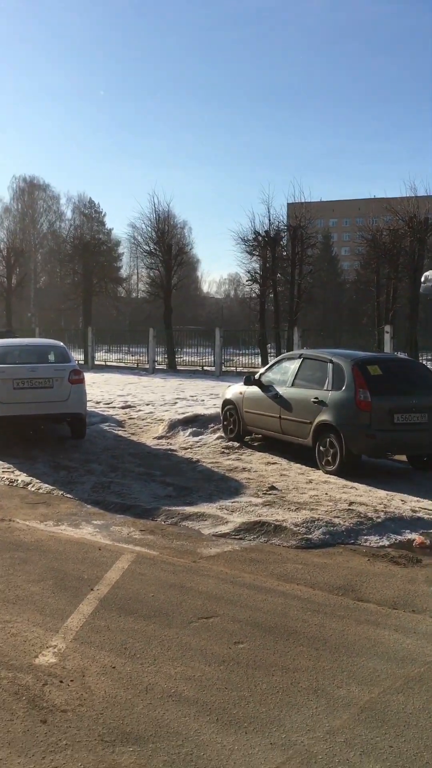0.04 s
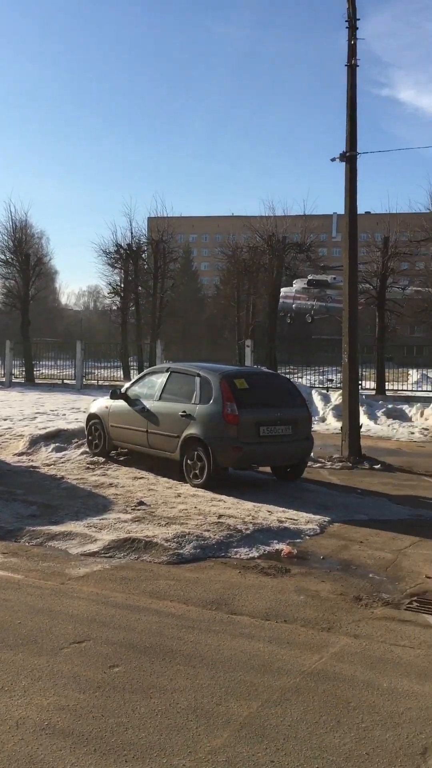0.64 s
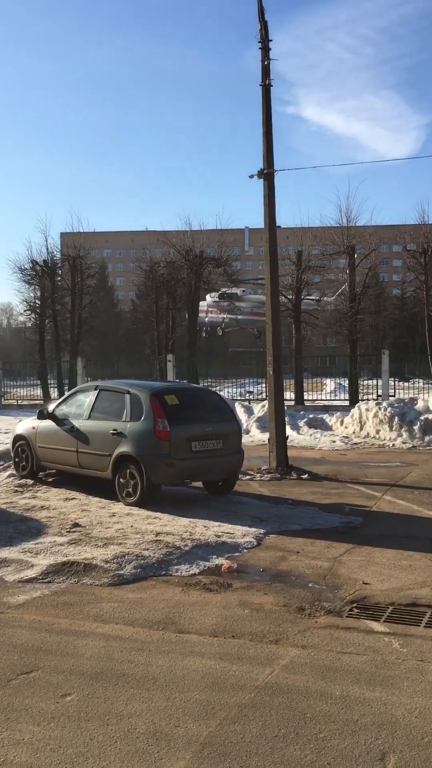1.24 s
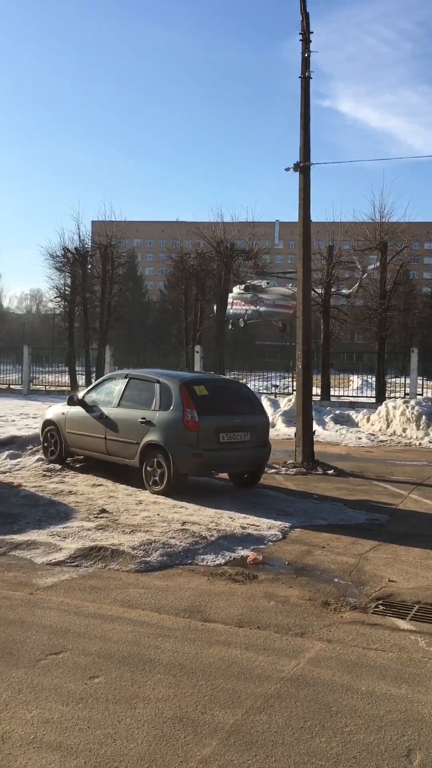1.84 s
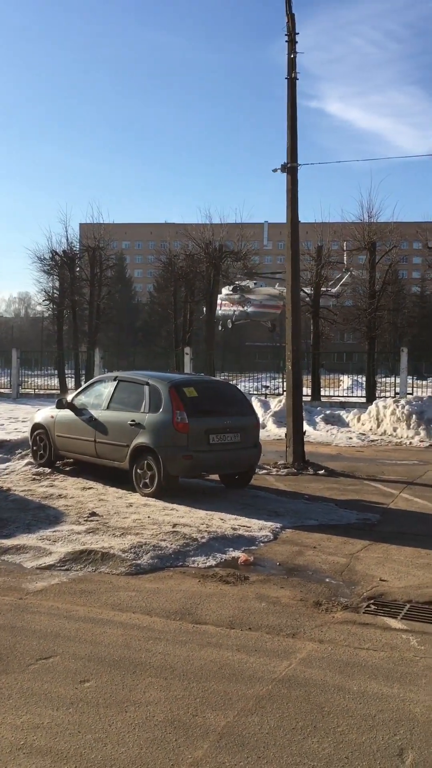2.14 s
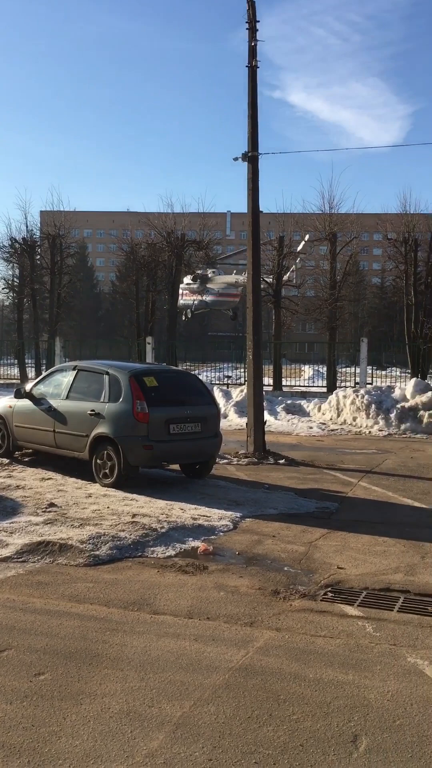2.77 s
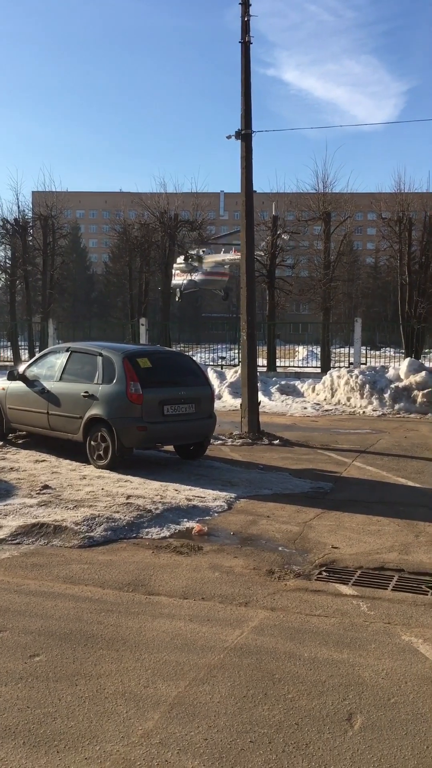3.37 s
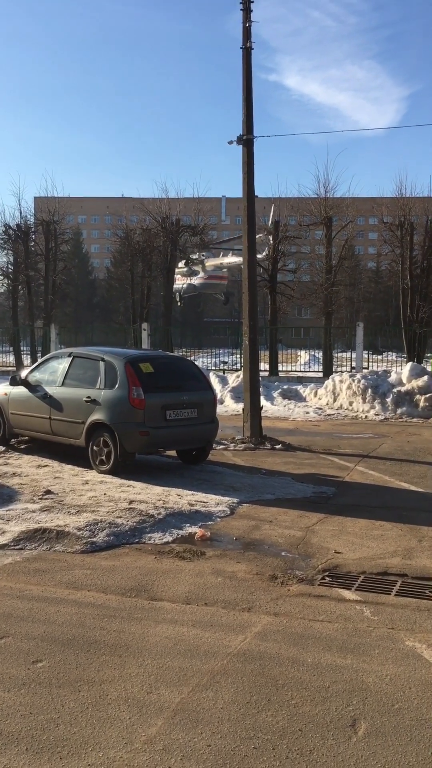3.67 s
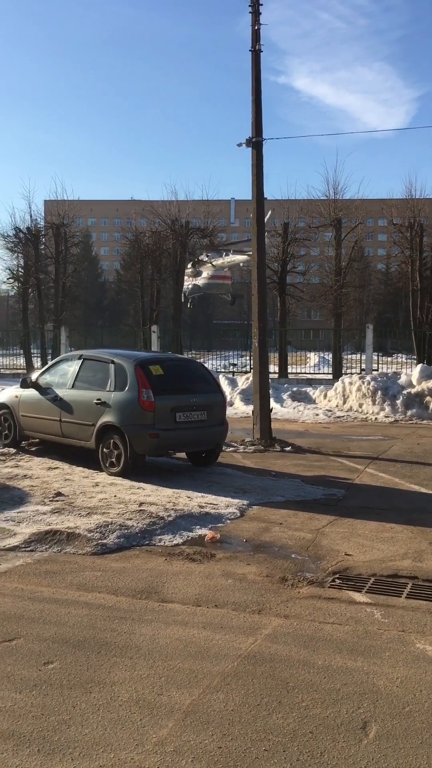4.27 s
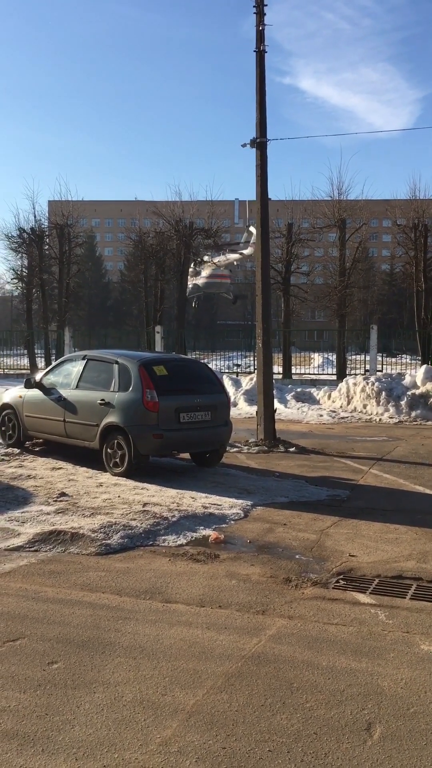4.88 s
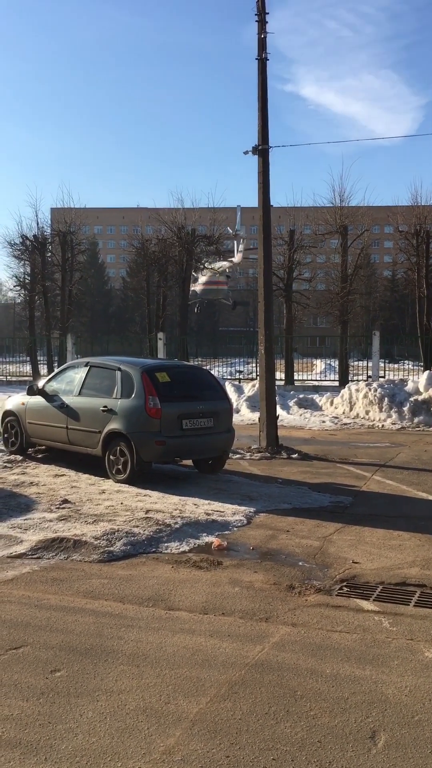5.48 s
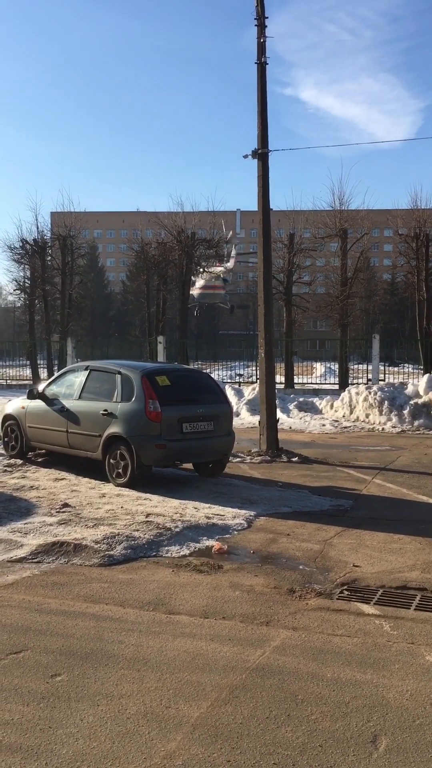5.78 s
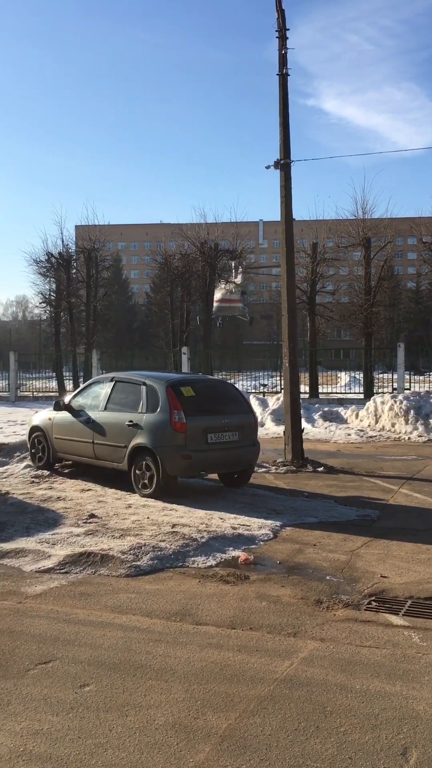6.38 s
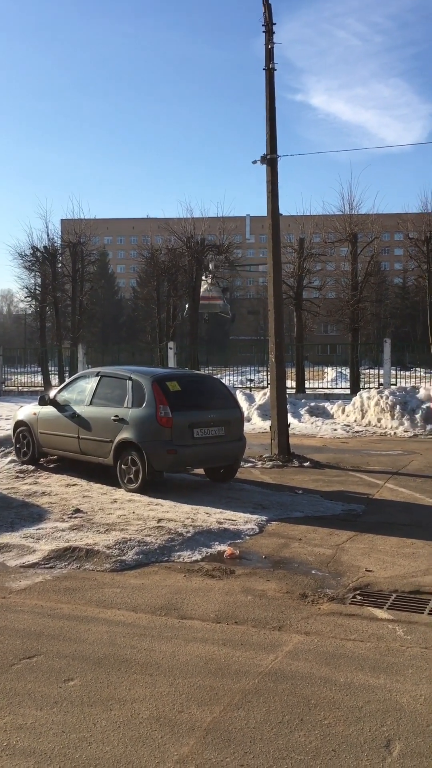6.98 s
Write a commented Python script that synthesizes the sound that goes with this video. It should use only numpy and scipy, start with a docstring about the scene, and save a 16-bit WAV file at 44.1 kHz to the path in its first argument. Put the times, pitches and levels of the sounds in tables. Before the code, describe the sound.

Heard from across an open car park, a hovering helicopter beats the air with fast thumps and slaps. Downwash roar, a tail rotor drone and soft wind on the microphone run underneath. The beats grow louder and sharper, knocking and then cracking, before a brief hollow hum bridges them. They then ease into a swishing chop with a thin turbine whine and occasional knocks.

```python
"""A helicopter hovers and slowly turns in front of a long building, beyond a snowy car park.
From the start each main blade slaps through the tip vortices of the blades ahead and swishes past,
thrown back by ground and building, over tail rotor drone, the rush of downwash and turbines, and wind.
From 1.5 s the chop hardens into knocks, then whip cracks; near 3 s hollow tones bridge the beats.
Then the chop turns softer and swishier, a thin turbine whine grows, and a few last knocks stand out."""
import sys
import numpy as np
from scipy import signal
from scipy.fft import next_fast_len
from scipy.io import wavfile
from scipy.ndimage import uniform_filter1d, minimum_filter1d

SR = 44100
rng = np.random.default_rng(int(sys.argv[2]) if len(sys.argv) > 2 else 0)


def generate_wav(sig):
    """Save sig (samples, or channels by samples) to the path in sys.argv[1] as 16-bit PCM at SR."""
    pcm = np.round(np.clip(np.atleast_2d(sig).T, -1, 1) * 32767).astype(np.int16)
    wavfile.write(sys.argv[1], SR, pcm)


N = 318402
T = np.arange(N) / SR
BLADE_PERIOD_S = .06044

# when in its cycle a blade sweeps towards the listener: (time [s], lag [s])
BLADE_LAG = [(0, 0.0057), (.6, 0.0094), (1.5, 0.013), (2.2, .017), (3.2, 0.02), (4.2, 0.024), (5, .025),
             (6, 0.027), (7.2, 0.029)]
# the strikes scatter as the machine turns: (time [s], scatter [s], swish share of the slap [0-1])
STRIKE_SPREAD = [(0, 0.0069, 0.68), (.5, 0.0068, 1), (.62, 0.0018, 0.73), (1.1, 0.0033, 0.56),
                 (1.6, 0.0035, 0.2), (2.3, 0.0053, 0.3), (3.2, 0.0064, 0.8), (4.6, .009, 0.51),
                 (5.8, 0.0086, 0.59), (6.5, 0.0068, 0.43), (7.2, 0.0089, 0.5)]


def main_rotor():
    """The chop: vortex strikes give a thump, a slap and a crack; the swish fills in around them."""
    # swells as the blades dip into their own wake: (time [s], thump [dB], slap [dB], crack [dB])
    chop_levels = [(0, -36, -30, -58), (.25, -36, -37.5, -55), (.52, -30.5, -35, -52.5),
                   (.68, -37, -33.5, -50.5), (.92, -37, -31.5, -49), (1.35, -30, -28, -48.5),
                   (1.53, -25.5, -24.5, -46.5), (1.85, -28.5, -26.5, -48), (2.08, -21.5, -25, -46.5),
                   (2.32, -29.5, -25.5, -47.5), (2.5, -30.5, -29, -49.5), (2.7, -29.5, -26, -47.5),
                   (3.05, -32, -30.5, -50), (3.3, -29.5, -28.5, -47), (3.55, -25, -31.5, -48),
                   (3.9, -26.5, -31, -49.5), (4.3, -27.5, -32.5, -51), (5.4, -29, -31, -53),
                   (5.9, -27.5, -29.5, -51), (6.2, -30, -30.5, -52), (6.5, -30.5, -30.5, -51),
                   (6.73, -31.5, -31, -50), (6.9, -27, -36.5, -60), (7.2, -30.5, -35.5, -58)]
    # low body of the chop: (frequency [Hz], gain [dB])
    thump_eq = [(30, -43.5), (70, -5), (110, -15.5), (165, 0.5), (205, 6.5), (250, -2), (300, -1), (380, 0),
                (440, -6), (520, -15.5), (900, -37.5), (2000, -89.5)]
    # its midrange smack: (frequency [Hz], gain [dB])
    slap_eq = [(150, -35), (380, -4.5), (520, 0), (750, -2.5), (1000, -1.5), (1300, -8), (1700, -7.5),
               (2200, -22), (4000, -51), (9000, -90.5)]
    # its bright edge: (frequency [Hz], gain [dB])
    crack_eq = [(600, -91), (1500, 9), (2050, 5.5), (2650, 5.5), (3300, -2), (4000, -4.5), (5000, -13),
                (8000, -19.5), (15000, -39)]
    # a brisker cut through the vortex rings higher: (time [s], pitch [Hz])
    thump_pitch = [(0, 265), (.35, 184), (.65, 250), (.88, 198), (1.15, 313), (1.7, 308), (2.05, 253),
                   (2.35, 305), (2.6, 218), (2.95, 260), (3.4, 233), (3.75, 307), (4.05, 270), (4.3, 197),
                   (5.1, 243), (5.8, 194), (6.7, 307), (7.2, 195)]
    shared_db = blade_unevenness(spread_db=.34)
    thump_db, slap_db, crack_db = [db + shared_db + blade_unevenness(.83) for db in curves(chop_levels)]
    swish_share = curves(STRIKE_SPREAD)[1]
    thump_at, slap_at = strike_times()
    # only the advancing side of the disc makes sharp strikes; later ones just thump
    sharp = per_blade(strikes(slap_at - .0014, side_db=-.5, lead_db=-6.5, jitter_s=.00028))
    air = np.sqrt(1 - swish_share) * sharp + np.sqrt(swish_share) * per_blade(swish(width=.86))
    air = colour(ground(air, bounce=.14), slap_eq, causal=True)
    slap_hz = (752 - 19 * T) * (1 + .08 * wander(2.7))  # falls as the strikes grow more glancing
    slap = resonate(air, slap_hz, width_hz=300) + .3 * air
    # a vortex core has a width, so the top treble is swish alone
    fizz = .45 * lowpass(sharp, 3200) + per_blade(swish(width=1.58))
    crack = colour(ground(fizz, bounce=.85), crack_eq, causal=True)
    blows = strikes(thump_at - .0038, side_db=-6.5, lead_db=-12, jitter_s=.00016)
    push = colour(blows, thump_eq, causal=True)
    thump = resonate(push, curves(thump_pitch)[0], width_hz=224) + .2 * push
    return (gain_of(slap_db) * per_blade(slap)
            + gain_of(crack_db) * per_blade(crack)
            - gain_of(thump_db) * per_blade(thump))


def strike_times():
    """When each blade thumps and when it slaps: near mid-sweep, looser when the strikes scatter."""
    # thump and slap part as the machine turns: (time [s], thump delay [s], slap delay [s])
    strike_delays = [(0, -0.00012, -0.0039), (.6, -0.011, -0.0022), (1.5, 0.0013, 0.0015),
                     (2.1, -0.0018, -0.0047), (2.8, -0.0011, 0.0004), (3.3, 0.0032, 0.01),
                     (4.4, 0.0086, -0.000004), (5.5, 0.0098, -.003), (6.2, 0.007, 0.0022),
                     (6.65, 0.00048, 0.0027), (7.2, 0.011, 0.015)]
    sweep = blade_times()
    wobble = .251 * curves(STRIKE_SPREAD, sweep)[0] * wander(5, sweep)
    return [sweep + delay + wobble for delay in curves(strike_delays, sweep)]


def strikes(at, side_db, lead_db, jitter_s, drift_hz=.42, count=5):
    """A blade clips one vortex, meets a strong one and grazes weak ones that slide as the wake sinks."""
    sweep = blade_times()
    scatter = curves(STRIKE_SPREAD, at)[0]
    train = clicks(at + jitter_s * rng.standard_normal(len(at)), np.ones(len(at)))
    lead_at = sweep - scatter * (1 + .145 * wander(2.5, at))
    train += clicks(lead_at, gain_of(lead_db + 4.4 * wander(3.6, at)))
    for k in range(count):
        place = (k / count + drift_hz * at + .061 * wander(2.5, at)) % 1
        size = gain_of(side_db) * np.sin(np.pi * place) * wander(3.5, at)
        train += clicks(sweep + 2 * scatter * (1 - 2 * place), size)
    return train


def swish(width, skew=.5):
    """Turbulence off the blade tip: a fast attack and a slower decay as the blade sweeps past."""
    scatter = curves(STRIKE_SPREAD)[0]
    cycles = (T - curves(BLADE_LAG)[0]) / BLADE_PERIOD_S
    offset_s = ((cycles + .5) % 1 - .5) * BLADE_PERIOD_S
    across = offset_s / (width * scatter) + skew
    return rng.standard_normal(N) / (1 + (across / (1 + skew * np.sign(across))) ** 2)


def vortex_runs():
    """Blade after blade thumps through one vortex, each a little earlier, swelling and fading."""
    # strong vortices: (peak time [s], half-width [s], slide per blade [s], peak [dB], pitch [Hz])
    vortices = [(0.8556, 0.1, 0.00063, -10.5, 217), (1.038, 0.052, 0.0012, -10.5, 257),
                (1.1608, 0.071, 0.0019, -8, 320), (1.3423, 0.062, 0.0009, -7.5, 292),
                (2.5566, 0.13, 0.0011, -12, 237), (2.6808, 0.07, 0.00055, -9, 229),
                (2.81, 0.2, 0.00122, -17.5, 383), (2.984, 0.13, 0.00058, -8, 225),
                (3.1061, 0.061, .001, -12, 296), (3.2877, 0.14, 0.00083, -5.5, 217),
                (3.713, 0.092, 0.0012, -13, 356), (3.8927, 0.2, 0.00049, -13, 286),
                (4.254, 0.2, 0.0002, -16, 179), (4.6234, 0.39, 0.00068, -12, 201),
                (4.9849, 0.067, 0.0009, -15, 210), (5.3423, 0.11, 0.00013, -14, 289),
                (5.5381, 0.27, 0.00089, -13.5, 174), (6.012, 0.13, .0006, -15, 234),
                (6.3255, 0.095, 0.0011, -13, 197), (6.495, 0.17, 0.00076, -16, 297)]
    out = np.zeros(N)
    for peak_s, half_width, slide, db, hz in vortices:
        offsets = np.arange(-12, 13) * (BLADE_PERIOD_S - slide)
        sizes = gain_of(db + 1.6 * rng.standard_normal(len(offsets))) * bell(offsets, half_width)
        thump = pulse(hz, cycles=.61)
        for offset, size in zip(offsets, sizes):
            add(out, peak_s + offset, size * thump)
    return out


def hard_slaps():
    """A deep thump, and beside it a compact, woody knock with a bright crack."""
    # accents in the chop: (time [s], thump peak [dB], thump pitch [Hz], knock delay [s],
    # knock level [dB], knock pitch [Hz], crack [dB])
    accents = [(1.4656, -7.5, 264, -.0037, -24, 700, -47), (1.5247, 0, 307, .0027, -9, 775, -46),
               (1.5868, -7.5, 294, 0, -13, 805, -42.5), (1.6465, -4.5, 286, 0, -20, 760, -47.5),
               (1.7061, -5.5, 279, 0, -11, 793, -46), (1.7661, -9, 280, 0, -9, 800, -46),
               (1.8278, -10, 335, 0, -12, 720, -53), (1.887, -16.5, 244.7, 0, -23, 830, -49),
               (1.9532, -6, 278, -.0065, -13.5, 784, -49), (2.0131, -11, 210, -.0068, -21.5, 730, -55),
               (2.0725, -5.5, 205, -.0056, -11.5, 770, -39.5), (2.132, -4.5, 227, -.005, -12.5, 730, -54),
               (2.6809, -28.5, 223, -.0055, -12, 710, -50.5), (5.226, -22, 302, -.006, -18.5, 920, -53.5),
               (5.891, -26, 240, -.007, -18.5, 825, -58), (5.951, -33.5, 242, -.007, -15.5, 750, -55),
               (6.075, -25, 242, -.005, -16, 760, -58), (6.4951, -20, 290, 0, -22, 800, -52),
               (6.7362, -18, 330, 0, -19, 700, -56), (6.808, -22, 292, -.0115, -14, 730, -60)]
    out = np.zeros(N)
    bark = gain_of(-11.5) * pulse(hz=1610, cycles=.7)
    for s, thump_db, thump_hz, delay, knock_db, knock_hz, _ in accents:
        add(out, s, gain_of(thump_db) * pulse(thump_hz, cycles=.46))
        add(out, s + delay, gain_of(knock_db) * (pulse(knock_hz, cycles=1) + bark))
    at, _, _, delay, _, _, crack_db = np.transpose(accents)
    return out + cracks(at + delay, crack_db)


def whips(run_up_s=.0043, rasp_hz=756, suction_s=.00014, ring_s=.0025):
    """A rasp runs up to a sharp suction; the pressure snaps back with a crack and rings as a thump."""
    # blades that hit a vortex head on:
    # (time [s], suction peak [dB], thump level [dB], thump pitch [Hz], rasp [dB], crack [dB])
    head_on_hits = [(0.614, -5, -7.5, 247, -35, -52), (0.674, -7.5, -9, 263, -37, -52),
                    (2.1952, -6, -8.5, 280, -27.5, -43.5), (2.2546, -3, -3.5, 290, -25, -39.5),
                    (2.3141, -3.5, -5, 322, -30.5, -38.5), (2.3734, -6, -6, 304, -33.5, -45.5),
                    (2.433, -17, -9, 267, -46, -53.5)]
    out = np.zeros(N)
    t = np.arange(-SR // 50, SR // 50) / SR
    since_snap = suction_s * np.logaddexp(0, t / suction_s)  # with a rounded start
    suction = 1 / np.cosh(np.minimum(abs(t) / suction_s, 20))
    for s, suction_db, thump_db, thump_hz, rasp_db, _ in head_on_hits:
        rasp = unit_rms(resonate(rng.standard_normal(len(t)), np.full(len(t), rasp_hz), width_hz=260))
        rasp *= bell(t, run_up_s) * (t < 0)
        thump = np.sin(2 * np.pi * thump_hz * since_snap) * bell(since_snap, ring_s)
        add(out, s, gain_of(rasp_db) * rasp - gain_of(suction_db) * suction + gain_of(thump_db) * thump)
    at, *_, crack_db = np.transpose(head_on_hits)
    return out - cracks(at, crack_db)


def cracks(times, level_db, decay_s=.0016, splash=.31):
    """A steep shock with a brief splash of torn air behind it; levels are over one blade passage."""
    # bite of the sharpest cracks: (frequency [Hz], gain [dB])
    shock_eq = [(400, -15.5), (1200, 10.5), (1800, 9), (2600, 7.5), (5000, -10), (9000, -20), (15500, -34)]
    shocks = clicks(times, gain_of(level_db))
    envelope = signal.lfilter([1], [1, -np.exp(-1 / (decay_s * SR))], shocks + 1e-18)
    torn_air = envelope * rng.standard_normal(N)
    rms = np.sqrt(np.sum(shocks ** 2) * BLADE_PERIOD_S / T[-1])
    return rms * colour(shocks + splash * torn_air, shock_eq, causal=True)


def throb():
    """The smooth, bassy pressure pulse of the air each main blade pushes aside."""
    # weight of the pulse: (frequency [Hz], gain [dB])
    throb_eq = [(16, -62.5), (33, -3), (50, -1.5), (66, 7.5), (85, 13), (115, 13.5), (150, 6), (250, -52)]
    # its swells: (time [s], level [dB])
    throb_level = [(0, -38.5), (.7, -30), (1.1, -35.5), (1.5, -31.5), (2.05, -33), (2.3, -42), (2.7, -42),
                   (3.6, -35.5), (4.5, -40), (5.5, -43), (7.2, -39)]
    at = blade_times() - .003
    pushes = clicks(at, gain_of(2.2 * wander(3.3, at)))
    return gain_of(curves(throb_level)[0]) * colour(pushes, throb_eq, causal=True)


def held_tones(waver_hz=3.5, flutter_db=1.4):
    """For a moment a hollow, wavering tone holds on and bridges the gaps between blades."""
    # hollow tones: (centre time [s], half-width [s], pitch [Hz], level [dB])
    tones = [(2.92, 0.31, 381, -30.5), (3.28, 0.19, 466, -36.5), (3.36, 0.11, 360, -36),
             (6.6, 0.12, 380, -36)]
    out = np.zeros(N)
    for s, half_width, hz, db in tones:
        phase = phase_of(hz + waver_hz * wander(11))
        envelope = gain_of(db + flutter_db * wander(16)) * plateau(s, half_width)
        out += envelope * np.sqrt(2) * np.cos(phase)
    return out * blade_tremolo()


def ground(x, bounce):
    """The bounce off the ground combs the sound; the comb sways with the hover."""
    # extra travel of the bounce: (time [s], delay [s])
    bounce_delay = [(0, 0.0011), (.65, 0.00058), (1.2, 0.001294), (2.3, .0012), (2.8, 0.0015),
                    (4.5, 0.00155), (6, 0.0017), (7.2, 0.0016)]
    delay = curves(bounce_delay)[0] * (1 + .08 * wander(1.5))
    return x + bounce * np.interp(T - delay, T, x)


def yard(x, tail_db, sway_s):
    """Dull near reflections that shift as the machine moves; a diffuse tail from building and trees."""
    # early reflections: (delay [s], level [dB])
    echoes = [(0.0103, -12.5), (0.0129, -11.5), (.0164, -20)]
    # the yard's reverb: (frequency [Hz], time to fall 60 dB [s])
    reverb_times = [(100, 0.82), (500, 0.26), (2000, 0.89), (8000, 0.62)]
    dull = lowpass(x, 750)
    near = sum(gain_of(db) * np.interp(T - delay - sway_s * wander(.88), T, dull) for delay, db in echoes)
    hz, t, noise = signal.stft(rng.standard_normal(SR // 2), SR, nperseg=256)
    decay = gain_of(-60 * t / at_hz(reverb_times, hz)[:, None])
    attack = np.minimum(t / .0023, 1)
    tail = signal.istft(noise * decay * attack, SR, nperseg=256)[1]
    wet = unit_rms(signal.fftconvolve(x, tail)[:N]) * x.std()
    return near + gain_of(tail_db) * wet


def tail_rotor(flutter_db=2.6, flutter_rad=.42):
    """A low drone whose overtones grow as the tail swings round, fluttering in the main rotor's wake."""
    # the drone: (time [s], blade rate [Hz], fundamental [dB], overtones [dB])
    drone = [(0, 57.9, -35.5, -39), (.8, 56.35, -41, -55), (1.7, 55.1, -37.5, -66), (2.7, 56.6, -36.5, -58),
             (3.8, 56.8, -34.5, -41), (4.4, 56.52, -38.5, -41), (5.5, 57.3, -36.5, -37.5),
             (6.4, 57.88, -38.5, -35), (7.2, 57.53, -34.5, -39)]
    # its overtone balance: (multiple of the blade rate, gain [dB])
    harmonics = [(2, 0.5), (3, -2.5), (4, -2.5), (5, -4), (6, -2), (7, -8), (8, -11)]
    hz, fundamental_db, overtones_db = curves(drone)
    phase = phase_of(hz)
    overtones = np.zeros(N)
    for order, db in harmonics:
        level = gain_of(db + flutter_db * wander(11))
        overtones += level * np.cos(order * phase + flutter_rad * wander(12) + 2 * np.pi * rng.random())
    # the rotor beams its fifth harmonic at the listener as it swings past
    beam = gain_of(-30 + .41 * wander(4)) * plateau(s=3.58, half_width=.52) * np.cos(5 * phase)
    fundamental = gain_of(fundamental_db + .62 * wander(3)) * np.cos(phase)
    return np.sqrt(2) * (fundamental + gain_of(overtones_db) * overtones + beam * blade_tremolo())


def rush():
    """Downwash and exhaust roar, swaying in the wind; an airy band swells over it now and then."""
    # body of the roar: (frequency [Hz], gain [dB])
    roar_eq = [(20, -36), (45, -4.5), (110, -11), (200, 0), (330, 2), (500, -1.5), (850, -4.5), (1600, -13),
               (2200, -23), (3200, -28.5), (5000, -39.5), (9000, -51), (15500, -59)]
    # its slow sway: (time [s], level [dB])
    roar_level = [(0, -36.5), (.8, -33), (1.6, -35.5), (2.4, -38), (3.2, -33.5), (4, -36), (5, -34.5),
                  (6, -36), (7.2, -36)]
    # the airy band: (frequency [Hz], gain [dB])
    airy_eq = [(400, -27), (680, -8.5), (850, 4), (1100, -2), (1400, -10), (2100, -14.5), (4000, -26),
               (7000, -58)]
    # its swells: (time [s], level [dB])
    airy_level = [(0, -37), (.3, -40), (.7, -48), (2.6, -54.5), (3.3, -39), (3.8, -53.5), (7.2, -43)]
    roar = noise_bed(curves(roar_level)[0] + .48 * wander(4.6), roar_eq)
    return roar + noise_bed(curves(airy_level)[0], airy_eq)


def turbines():
    """A fine hiss fades as the intakes turn away, while a narrow, breathy whine grows."""
    # turbine balance: (time [s], hiss [dB], whine [dB])
    turbine_levels = [(0, -58.5, -77), (1, -62, -77), (2.5, -62.5, -78), (3.05, -62, -80),
                      (3.4, -62.5, -71.5), (4.3, -65, -72), (5.1, -65.5, -73), (5.6, -64.5, -70.5),
                      (6.6, -66, -70.5), (7.2, -64, -70)]
    # sheen of the hiss: (frequency [Hz], gain [dB])
    hiss_eq = [(500, -59), (2000, -14.5), (5500, 7.5), (7500, 1), (9800, 2.5), (10400, -3.5), (11200, 1),
               (13500, 1.5), (15800, -2.5)]
    # thin peak of the whine: (frequency [Hz], gain [dB])
    whine_eq = [(8000, -70), (11000, -13), (12200, -12), (12800, 9), (13080, 6), (13400, 9), (13900, -18),
                (15500, -45)]
    hiss_db, whine_db = curves(turbine_levels)
    return noise_bed(hiss_db + .5 * wander(5), hiss_eq) + noise_bed(whine_db + .4 * wander(6), whine_eq)


def wind():
    """A soft, lumpy rumble that rises and falls with the moving air."""
    # gusts and lulls: (time [s], level [dB])
    gusts = [(0, -32), (.6, -38.5), (2, -34.5), (4, -35), (5, -42), (6, -45), (6.7, -34.5), (7.2, -32)]
    # low rumble of the wind: (frequency [Hz], gain [dB])
    rumble_eq = [(20, -37.5), (55, 2.5), (85, 2), (150, 3.5), (200, -1), (400, -39), (1500, -100)]
    return noise_bed(curves(gusts)[0] + 1.7 * wander(4.7), rumble_eq)


def blade_times():
    """The moments at which successive main blades arrive."""
    beats = np.arange(int(T[-1] / BLADE_PERIOD_S) + 1) * BLADE_PERIOD_S
    return beats + curves(BLADE_LAG, beats)[0]


def hold_per_blade(values):
    """Holds one value through each blade passage, with short crossfades."""
    at = blade_times()
    nearest = np.searchsorted((at[1:] + at[:-1]) / 2, T)
    return uniform_filter1d(values[nearest], size=400)


def blade_unevenness(spread_db):
    """No two blades hit alike: a random level in dB for each passage."""
    return spread_db * hold_per_blade(rng.standard_normal(len(blade_times())))


def per_blade(x):
    """Gives every blade passage the same energy, at rms 1 overall."""
    power = np.interp(blade_times(), T, uniform_filter1d(x ** 2, round(BLADE_PERIOD_S * SR)))
    return x / np.sqrt(hold_per_blade(abs(power)) + 1e-9)


def blade_tremolo(depth=.55, lag_s=.011):
    """A gain that swells just after each main blade has passed and sags before the next."""
    since = T - curves(BLADE_LAG)[0] - lag_s
    return 1 + depth * np.cos(2 * np.pi * since / BLADE_PERIOD_S)


def pulse(hz, cycles):
    """A push of air between two suctions; more cycles make it ring."""
    turns = hz * np.arange(-SR // 80, SR // 80) / SR
    return np.cos(2 * np.pi * turns) * bell(turns, cycles)


def clicks(times, sizes):
    """A train of single impulses."""
    samples = np.clip(np.round(times * SR).astype(int), 0, N)
    return np.bincount(samples, sizes * (times > 0), N + 1)[:N]


def noise_bed(level_db, eq):
    """Coloured noise riding a level curve."""
    return gain_of(level_db) * colour(rng.standard_normal(N), eq)


def colour(x, eq, causal=False):
    """Applies an EQ curve, to rms 1; a causal filter rings only after each pulse."""
    size = next_fast_len(N + SR // 4)
    log_gain = np.log(gain_of(at_hz(eq, abs(np.fft.fftfreq(size, 1 / SR)))))
    response = np.exp(np.conj(signal.hilbert(log_gain)) if causal else log_gain)
    return unit_rms(np.fft.ifft(np.fft.fft(x, size) * response).real[:N])


def resonate(x, hz, width_hz):
    """A resonance of gain 1 that follows the curve hz."""
    carrier = np.exp(1j * phase_of(hz))
    pole = np.exp(-np.pi * width_hz / SR)
    return 2 * (carrier * signal.lfilter([1 - pole], [1, -pole], x / carrier)).real


def lowpass(x, hz):
    """Rolls off the treble at 12 dB an octave."""
    return signal.sosfilt(signal.butter(2, hz, fs=SR, output="sos"), x)


def wander(rate, t=T):
    """Slow random drift of rms about 1, with up to rate swings a second."""
    grid = np.linspace(0, T[-1], num=1000)
    hz = np.geomspace(rate / 8, rate, num=16)[:, None]
    swings = np.sin(2 * np.pi * (hz * grid + rng.random(hz.shape)))
    return np.interp(t, grid, unit_rms(swings.sum(0)))


def plateau(s, half_width):
    """Swells, holds around the time s, and fades."""
    return np.exp(-((T - s) / half_width) ** 4 / 2)


def bell(x, half_width):
    """A smooth hump around zero."""
    return np.exp(-(x / half_width) ** 2 / 2)


def curves(rows, t=T):
    """Each column of a time table at the times t."""
    times, *columns = np.transpose(rows)
    return [np.interp(t, times, column) for column in columns]


def at_hz(points, hz):
    """Reads a frequency table on a log axis."""
    frequencies, values = np.transpose(points)
    return np.interp(np.log(hz + 1), np.log(frequencies + 1), values)


def phase_of(hz):
    """Running phase of a pitch curve, in radians."""
    return 2 * np.pi * np.cumsum(hz) / SR


def gain_of(db):
    """Decibels to amplitude."""
    return 10 ** (np.asarray(db) / 20)


def unit_rms(x):
    """Scales to rms 1."""
    return x / np.sqrt(np.mean(x ** 2) + 1e-20)


def add(mix, s, sound):
    """Mixes in a sound centred on the time s."""
    part = mix[max(round(s * SR) - len(sound) // 2, 0):][:len(sound)]
    part += sound[:len(part)]


def scene():
    """The chop with its echoes, over the steady bed, in mono."""
    chop = main_rotor() + vortex_runs() + hard_slaps() + whips()
    bed = tail_rotor() + rush() + turbines() + wind()
    return (chop + yard(chop, tail_db=-14, sway_s=.00015) + held_tones() + throb() + bed)[None]


def record(dry):
    """A limiter eases the tallest slaps down over a few milliseconds; a steep low-pass trims the top."""
    ceiling, cutoff_hz = .71, 15800
    overshoot = np.maximum(abs(dry) / ceiling, 1)
    gain = uniform_filter1d(minimum_filter1d(1 / overshoot, size=130), size=130)
    high_cut = signal.firwin(2047, cutoff_hz, window=("kaiser", 9), fs=SR)
    return signal.oaconvolve(dry * gain, high_cut[None], "same")


dry = scene()
out = record(dry)
generate_wav(out)
```